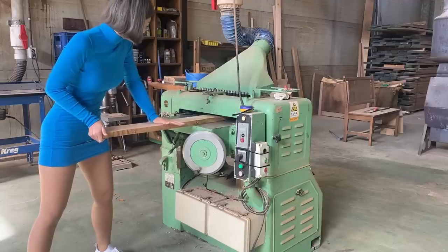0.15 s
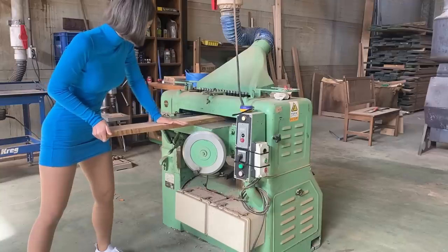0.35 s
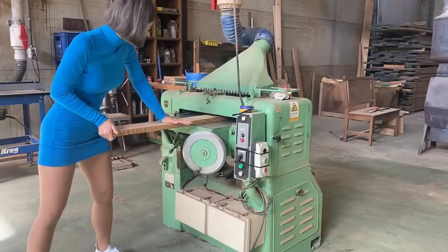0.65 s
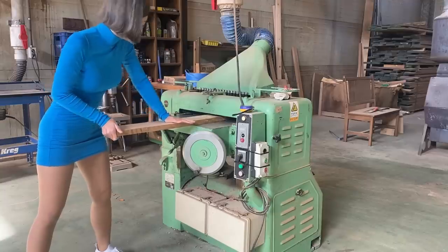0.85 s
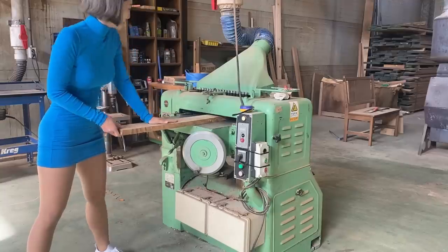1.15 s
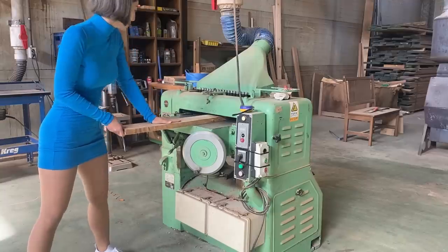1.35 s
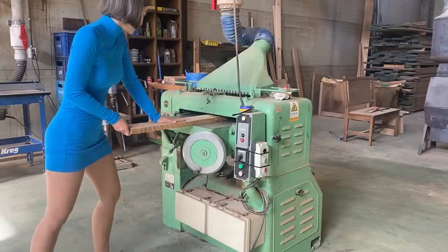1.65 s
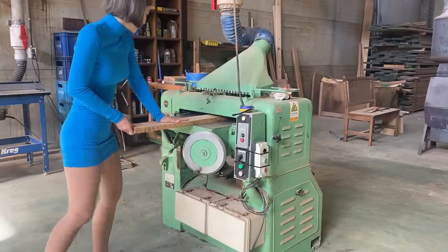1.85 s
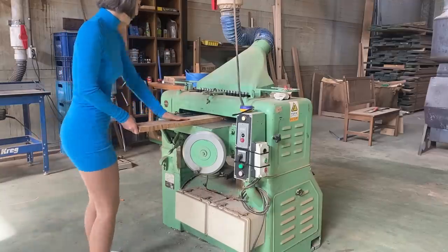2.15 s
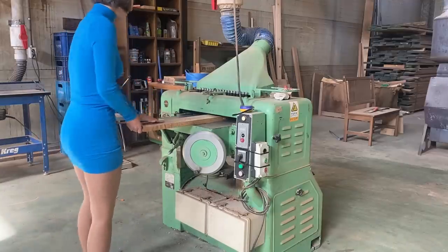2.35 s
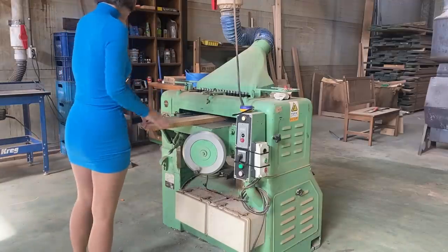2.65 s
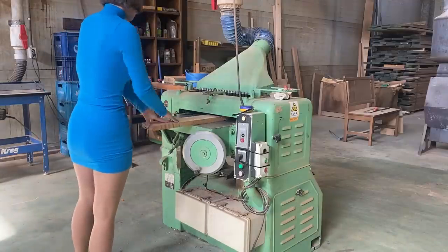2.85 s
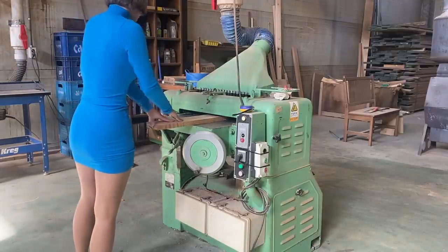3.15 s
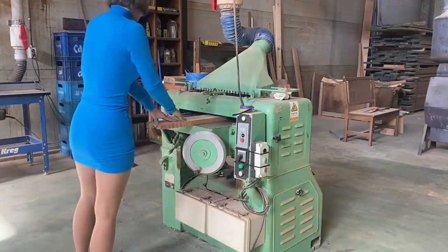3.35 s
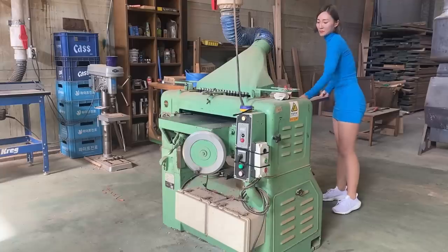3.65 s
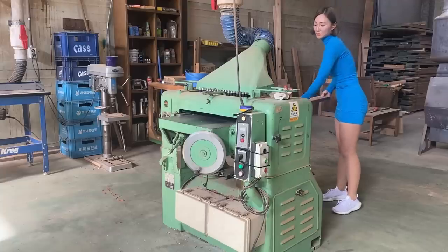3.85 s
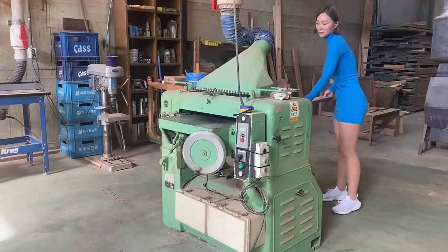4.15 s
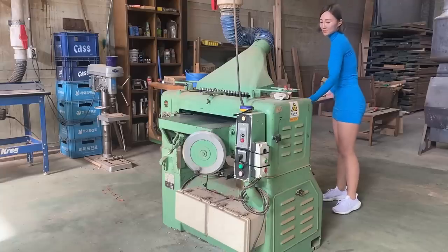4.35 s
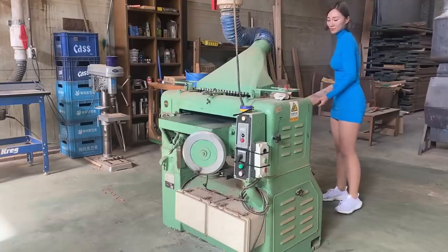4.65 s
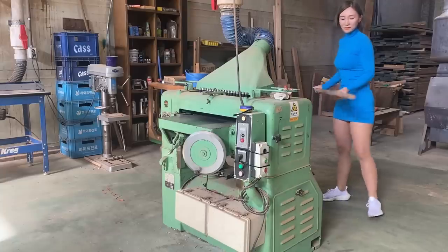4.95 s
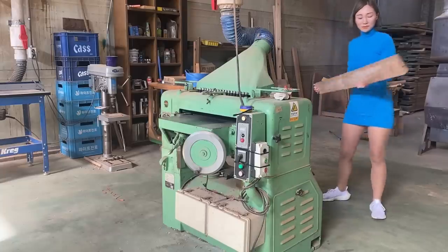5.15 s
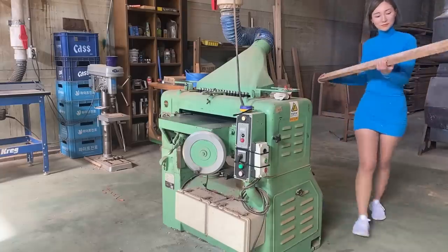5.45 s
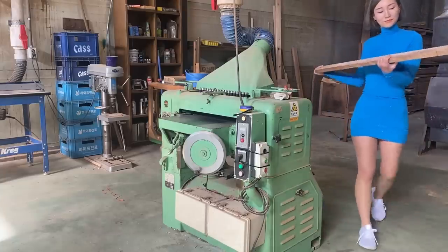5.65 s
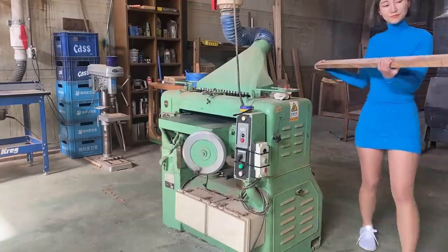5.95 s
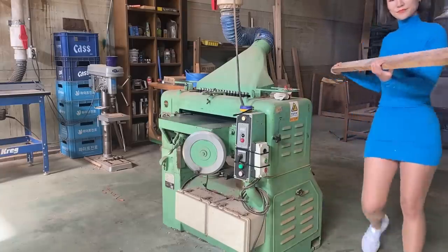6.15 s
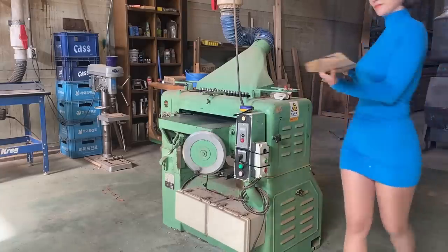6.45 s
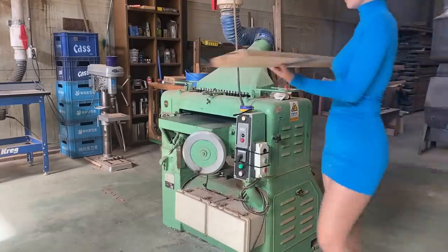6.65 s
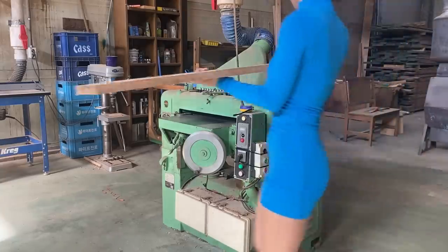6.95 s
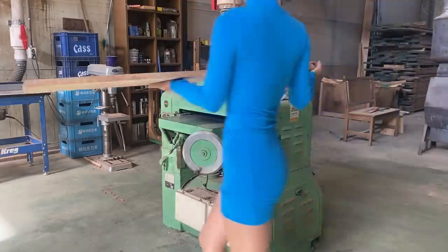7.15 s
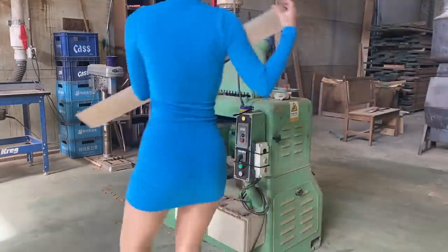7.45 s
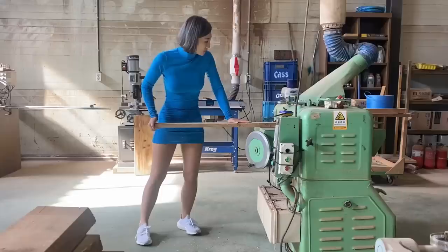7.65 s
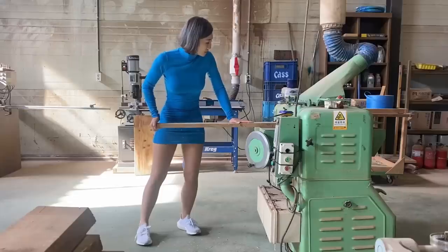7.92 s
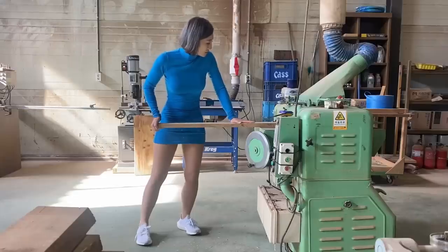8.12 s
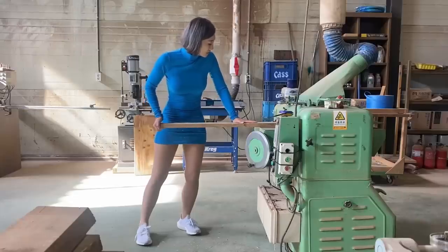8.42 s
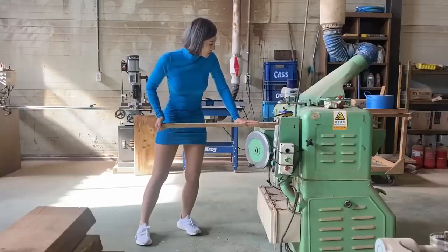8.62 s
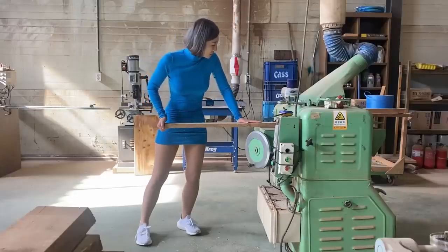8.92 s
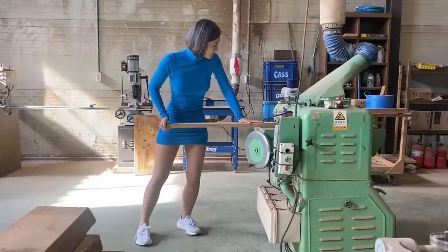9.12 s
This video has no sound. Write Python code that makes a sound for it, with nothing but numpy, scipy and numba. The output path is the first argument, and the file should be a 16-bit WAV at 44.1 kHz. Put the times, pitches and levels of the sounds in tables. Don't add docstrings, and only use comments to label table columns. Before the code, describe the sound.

From 0 s a large thickness planer is already cutting a board in a reverberant workshop: a steady low shaft buzz near 136 Hz carrying a bright, dense stack of harmonics, mostly 1 to 4 kHz, that shimmer and swell as the board slides through. Rapidly pulsing chip hiss roughens it, with a burst around 1 s; the top treble dulls after 2.3 s and the tail bites harder near 3 s. At 3.4 s it cuts abruptly to quieter idling: dull hum, rushing extractor air and a constant whistle near 520 Hz, creeping louder. Shoes scuff faintly at 4.1 s, clearly at 5.7 s, softly at 7.4 s. At 7.6 s another hard change brings a second cut, nearer, louder and brighter, with far more chip hiss and wandering whine, its finest treble gradually softening, continuing until 9.4 s.

```python
import sys
import numpy as np
from numba import njit
from scipy import signal
from scipy.fft import rfft, irfft
from scipy.io import wavfile
from scipy.ndimage import uniform_filter1d

SR = 44100
rng = np.random.default_rng(int(sys.argv[2]) if len(sys.argv) > 2 else 0)


def convert_level_to_amplitude(level_db):
    exponent = np.asarray(level_db, float) / 20
    return 10 ** exponent


def int16_out(signal):
    q = np.round(np.clip(np.atleast_2d(signal).T, -1, 1) * 32767)
    wavfile.write(sys.argv[1], SR, q.astype(np.int16))


N = 409248
STEP = 256

SPLICES = [
    0,
    3.419,
    7.622,
    9.4,
]
# time [s], load [dB].
LOAD = [
    [(0, 1.3), (0.5, 0.1), (1, -0.7), (1.4, -3.7), (2.2, -1.9), (2.78, -1.3), (2.95, 5.4), (3.2, 0.0),
     (3.42, 0.8)],
    [(7.62, 3.2), (7.75, 4.8), (7.95, -4.0), (8.1, -2.5), (8.3, -0.4), (8.5, -1.6), (8.7, -0.7),
     (9.1, -1.8), (9.28, 3.0)],
]
# frequency [Hz], side minus mid [dB].
SIDE_DB = [(50, -13), (100, -21.5), (180, -11), (300, -7), (480, -11), (750, -1.5), (1500, -1.5),
           (2800, -5), (4200, 0), (9000, -3.5), (11500, 3), (13000, 10), (15000, -3)]


def curve(rows):
    s, *columns = np.transpose(rows)
    return np.array([np.interp(np.arange(N) / SR, s, column) for column in columns])


def walk(rate, count):
    k = max(int(SR / STEP / rate), 1)
    x = rng.standard_normal((count, N // STEP + 3))
    x = uniform_filter1d(uniform_filter1d(x, k), k)
    return x / x.std()


def stretch(x):
    return np.interp(np.arange(N) / STEP, np.arange(len(x)), x)


def on_log_axis(hz, points):
    points = np.array(points)
    return np.interp(np.log(hz), np.log(points[:, 0]), points[:, 1])


def bump(s, at, half):
    return np.exp(-np.abs((s - at) / half) ** 3)


def shot_numbers():
    return np.searchsorted(np.array(SPLICES[1:]) * SR, np.arange(N), side="right")


def first_cut(turns):
    # order, left level [dB], right level [dB].
    first_orders = [(1, -67, -68.0), (2, -73, -72.5), (3, -67.0, -69.5), (4, -58.5, -60), (5, -69, -67.5),
                    (6, -72, -72.5), (7, -64.5, -71), (8, -54.5, -52), (9, -57.0, -57), (10, -55, -58),
                    (11, -55.0, -58.0), (12, -44.5, -46), (13, -48, -49.5), (14, -75, -62.5),
                    (15, -56, -62.5), (16, -47.5, -48.5), (17, -53, -54.5), (18, -59.5, -65),
                    (19, -56.5, -52.5), (20, -51.5, -58.5), (21, -50.5, -55.5), (22, -64, -55.5),
                    (23, -61.5, -64), (24, -64, -59.5), (25, -60, -59.5), (26, -63.5, -62.5),
                    (27, -57, -84), (28, -69, -67.0), (29, -62, -61), (30, -63, -65), (31, -60, -71.5),
                    (32, -60.0, -62), (38, -68, -73), (46, -67.5, -70.5), (56, -69.5, -76.5),
                    (68, -81.5, -81.5), (80, -80.5, -84), (92, -98, -91.5), (114, -86, -85)]
    # frequency [Hz], density [dB per Hz].
    first_chip_colour = [(300, -30), (750, -5.5), (1200, -3), (1900, -1), (2800, 0), (4200, -6),
                         (6500, -11), (9000, -16), (11500, -19), (13000, -25), (15500, -14)]
    knives = cutter(0, first_orders, turns, LOAD[0], wander_db=.9, wander_rad=.6, flicker_db=2.2, smear=.7)
    hissing = chips(LOAD[0], first_chip_colour, turns, db=-63.5, pan_db=1.8, gate=.5, patchy_db=2.6)
    return hood(knives + (shot_numbers() == 0) * hissing, 0)


def second_cut(turns):
    # order, left level [dB], right level [dB].
    second_orders = [(1, -58, -58), (2, -66, -66.5), (3, -57.0, -63), (4, -62, -53.0), (5, -54, -59.5),
                     (6, -74, -67), (7, -59.5, -58.0), (8, -53.0, -54.0), (9, -58, -56), (10, -53, -64),
                     (11, -61.5, -59), (12, -47, -53), (13, -54, -64), (14, -61.5, -52.5), (15, -55, -55),
                     (16, -45, -44), (17, -46, -49), (18, -53, -55), (19, -52, -61), (20, -58.5, -55),
                     (21, -50.5, -48.5), (22, -65, -52.5), (23, -56, -58), (24, -48.5, -54.5),
                     (25, -57.0, -64), (26, -57, -55), (27, -54.5, -52), (28, -54, -51), (29, -54.5, -56.0),
                     (30, -62, -68), (31, -53, -74), (32, -55.5, -54.5), (38, -61, -65), (46, -61.5, -66.0),
                     (56, -65.5, -69), (68, -69.5, -69), (80, -75, -75), (92, -87, -86), (114, -81, -77)]
    # frequency [Hz], density [dB per Hz].
    second_chip_colour = [(300, -17), (750, -4), (1200, -5.5), (1900, -1), (2800, .5), (4200, -3),
                          (6500, -6), (9000, -13), (11500, -15), (13000, -22), (15500, -17)]
    knives = cutter(2, second_orders, turns, LOAD[1], wander_db=.9, wander_rad=.65, flicker_db=2.4, smear=.9)
    hissing = chips(LOAD[1], second_chip_colour, turns, db=-53.7, pan_db=1.5, gate=.55, patchy_db=2.0)
    return hood(knives + (shot_numbers() == 2) * hissing, 1)


def idling(turns):
    # order, left level [dB], right level [dB].
    idle_orders = [(1, -63.0, -62.0), (2, -82, -79.5), (3, -70.5, -70.0), (4, -59.5, -64.5),
                   (5, -72.5, -72.0), (6, -77.5, -83), (8, -65, -65), (10, -86, -86), (11, -81.0, -91),
                   (12, -79, -73.0), (16, -73.5, -74.5), (20, -99, -93), (24, -88, -87), (28, -93, -92),
                   (32, -89, -94)]
    return cutter(1, idle_orders, turns, [], wander_db=1.3, wander_rad=.25, flicker_db=1.2, smear=.8)


def shaft_turns():
    # time [s], speed [Hz].
    first_speed = [(0.0, 136.3), (0.25, 136.1), (3.02, 136.0), (3.08, 135.5), (3.41, 135.6)]
    # time [s], speed [Hz].
    idle_speed = [(3.4, 137.68), (7.7, 137.68)]
    # time [s], speed [Hz].
    second_speed = [(7.64, 136.5), (7.68, 136.3), (9.184, 136.1), (9.266, 135.9), (9.28, 135.4)]
    shot = shot_numbers()
    tremble_hz = np.where(shot == 1, .1, .17) * stretch(walk(14, count=1)[0])
    speed = np.choose(shot, [curve(rows)[0] for rows in (first_speed, idle_speed, second_speed)])
    return np.cumsum(speed + tremble_hz) / SR


def cutter(shot, table, turns, load, wander_db, wander_rad, flicker_db, smear):
    steady_orders = [1, 4]
    first_cutting_order = 6
    first, last = int(SPLICES[shot] * SR), min(int(SPLICES[shot + 1] * SR), N)
    span = slice(first // STEP, last // STEP + 2)
    s = np.arange(span.start, span.stop) * STEP / SR
    listed, *listed_db = np.transpose(table)
    orders = np.union1d(listed, np.arange(32, listed[-1])).astype(np.int64)
    count, hz = len(orders), 136. * orders[:, None]
    chance = rng.standard_normal((count, 4)).T
    db = np.array([np.interp(orders, listed, d) for d in listed_db])
    db += (2.2 * chance[:2] - 3.0 + orders / 18) * (orders > 26)

    apart = np.arctan(convert_level_to_amplitude(on_log_axis(hz[:, 0], SIDE_DB))) * np.tanh(hz[:, 0] / 5000 + .4 * chance[3])
    phase = smear * np.cumsum(chance[2] * np.where(orders > 26, .9, 1.5)) + np.array([apart, -apart])

    weakness = np.clip(.45 + (db.max() - db.max(0)) / 16, 0, 1.3)
    loose = weakness * np.clip(orders / 28, 1, 1.5)
    loose = np.where(np.isin(orders, steady_orders), .15, loose)[:, None]
    shared = walk(3.5, count=2 * count)
    separate = walk(3.5, count=4 * count).reshape(2, 2 * count, -1)
    drift = .8 * shared + .65 * separate
    together = 1.6 * uniform_filter1d(drift, size=3, axis=1)
    drift = np.where(np.tile(hz, (2, 1)) > 4000, together, drift)
    level_drift, phase_drift = drift[:, :count], drift[:, count:, span]
    flicker = flicker_db * np.where(hz < 1000, .8, np.clip(hz / 3000, .5, .95))
    grain = flicker * loose * walk(17, count=count)
    size = convert_level_to_amplitude(wander_db * loose * level_drift + grain)[:, :, span]
    size = size * np.exp(1j * (phase[:, :, None] + wander_rad * loose * phase_drift))
    size *= convert_level_to_amplitude(db)[:, :, None] / np.sqrt(np.mean(np.abs(size) ** 2, axis=2, keepdims=True))

    bite = gain_control(np.clip(s, SPLICES[shot], SPLICES[shot + 1] - .001))[0]
    if len(load):
        cutting = np.interp(s, *np.transpose(load)) + board(hz, s, width=.065)
        bite = np.where(orders[:, None] >= first_cutting_order, cutting, bite)
    size *= swing(bite * np.clip(1.5 - hz / 13000, .7, 1)) * convert_level_to_amplitude(standing(shot, hz, s))
    return np.sqrt(2) * stack(turns, orders, np.ascontiguousarray(size.T), first, last, STEP)


@njit(fastmath=True)
def stack(turns, orders, size, first, last, step):
    out = np.zeros((2, len(turns)))
    for i in range(first, last):
        j = min(i // step - first // step, len(size) - 2)
        a = (i % step) / step
        z, p, k = np.exp(2j * np.pi * turns[i]), 1 + 0j, 0
        for n in range(len(orders)):
            while k < orders[n]:
                p, k = p * z, k + 1
            for c in range(2):
                out[c, i] += (p * (size[j, n, c] * (1 - a) + size[j + 1, n, c] * a)).real
    return out


def swing(db):
    return convert_level_to_amplitude(db) / np.sqrt(np.mean(convert_level_to_amplitude(db) ** 2, axis=-1, keepdims=True))


def board(hz, s, width):
    # time [s], half length [s], lift [dB], mode [Hz].
    first_swells = [(0.15, 0.04, 7.4, 2870.0), (0.31, 0.12, 7.0, 3230.0), (0.53, 0.07, 6.3, 2180.0),
                    (0.55, 0.07, 5.9, 2870.0), (0.55, 0.07, 8.6, 1470.0), (0.95, 0.12, 4.0, 2180.0),
                    (0.97, 0.07, 7.8, 1530.0), (1.03, 0.07, 10.1, 2980.0), (1.03, 0.07, 14.2, 3630.0),
                    (1.03, 0.35, 8.6, 1420.0), (1.25, 0.07, 8.0, 1530.0), (1.27, 0.07, 9.0, 3350.0),
                    (1.45, 0.35, 7.4, 1720.0), (1.47, 0.07, 7.6, 3490.0), (1.75, 0.35, 15.1, 1310.0),
                    (1.99, 0.2, 3.9, 1790.0), (2.01, 0.35, 7.6, 2980.0), (2.41, 0.12, 5.9, 2650.0),
                    (2.53, 0.35, 18.7, 1160.0), (2.55, 0.2, 6.7, 3490.0), (2.79, 0.07, 10.5, 3350.0),
                    (3.13, 0.2, 7.3, 3630.0), (3.13, 0.2, 11.4, 1530.0), (3.17, 0.2, 9.9, 2100.0),
                    (3.2, 0.27, 21, 970.0), (3.17, 0.35, 7.1, 1210.0), (3.31, 0.2, 8.3, 3100.0),
                    (3.35, 0.38, 16.2, 2650.0), (2.5, .42, 12, 820), (2.8, .15, 4, 2860)]
    # [s], [s], [dB], [Hz].
    second_swells = [(7.69, 0.07, 11.7, 2870.0), (7.75, 0.12, 5.4, 3770.0), (7.79, 0.13, 9, 1720.0),
                     (7.85, 0.07, 7.5, 2360.0), (7.89, 0.12, 7.4, 3100.0), (7.93, 0.12, 6.1, 3630.0),
                     (7.99, 0.12, 10.6, 1030.0), (7.99, 0.2, 3.9, 1590.0), (8.05, 0.12, 6.9, 2980.0),
                     (8.11, 0.12, 5.9, 2270.0), (8.11, 0.2, 8.7, 2650.0), (8.17, 0.12, 9.1, 1940.0),
                     (8.27, 0.07, 4.6, 4410.0), (8.23, 0.13, 7.5, 3740.0), (8.27, .09, 5, 6200),
                     (8.37, 0.04, 5.4, 2180.0), (8.57, 0.07, 5.0, 2550.0), (8.63, 0.04, 7.0, 2180.0),
                     (8.8, 0.15, 3.5, 4500.0), (8.99, 0.35, 12.7, 2180.0), (9.11, 0.07, 5.6, 4240.0),
                     (9.19, 0.12, 6.7, 2760.0), (9.21, 0.35, 4.0, 3230.0), (9.26, .05, 6, 2880)]
    return sum(db * bump(s, at, half) * np.exp(-(np.log(hz / mode_hz) / width) ** 2)
               for at, half, db, mode_hz in first_swells + second_swells)


def standing(shot, hz, s):
    # time [s], half length [s], left lift [dB], right lift [dB], frequency [Hz].
    first_early = [(0.02, 0.4, -3.5, -2.7, 1632), (0.04, 1.2, 4.9, 3.9, 3944),
                   (0.12, 0.06, -8.5, -7.0, 3400), (0.14, 0.1, 3.0, 5.2, 2856),
                   (0.14, 0.7, 0.8, -5.3, 2992), (0.16, 0.25, 7.7, 4.0, 3264),
                   (0.16, 0.7, -2.2, -3.7, 1496), (0.2, 0.06, -10.8, -4.7, 2040),
                   (0.2, 0.16, -7.2, -5.8, 3128), (0.2, 0.25, 3.8, 2.4, 2720), (0.2, 0.4, -2.6, -1.2, 1768),
                   (0.22, 0.06, -10.4, -7.2, 4352), (0.28, 0.06, -2.8, -6.8, 1088),
                   (0.42, 0.25, 6.2, 4.8, 4624), (0.52, 1.2, 2.6, 5.0, 952), (0.56, 0.4, -6.3, -5.6, 1088),
                   (0.6, 0.16, -5.9, -6.4, 3400), (0.78, 0.1, -4.8, -3.2, 2312),
                   (0.9, 0.06, -10.2, -8.8, 4488), (0.96, 0.06, 3.7, 5.5, 2856),
                   (0.96, 1.2, -3.4, 1.7, 2856), (1.0, 0.16, 5.4, 4.0, 3400), (1.04, 0.1, -0.7, -3.3, 1632),
                   (1.08, 1.2, 1.7, -5.2, 2584), (1.14, 1.2, -2.3, 6.3, 4488), (1.18, 1.2, -2.8, 3.3, 4216),
                   (1.2, 1.2, 2.5, -3.4, 1904), (1.24, 0.7, -8.5, -4.1, 2040),
                   (1.24, 1.2, -3.8, -7.8, 4760), (1.26, 0.4, -4.3, -2.4, 1360),
                   (1.26, 0.7, -4.0, -0.5, 1224), (1.4, 1.2, 6.4, 2.5, 4080), (1.42, 1.2, -6.4, 4.8, 3672),
                   (1.44, 1.2, 6.1, 5.4, 4624)]
    # [s], [s], [dB], [dB], [Hz].
    first_late = [(1.46, 0.1, -9.6, -9.5, 1496), (1.58, 0.06, -8.9, -7.1, 2312),
                  (1.66, 0.1, 9.4, 9.3, 2992), (1.72, 1.2, -0.4, -8.2, 2992),
                  (1.78, 0.06, -3.7, -2.2, 1632), (1.82, 0.16, -7.6, 0.5, 2720),
                  (1.88, 1.2, -2.6, -3.0, 2312), (1.92, 1.2, -3.5, -1.4, 1768), (2.0, 0.25, 3.0, 4.3, 2312),
                  (2.02, 0.1, 3.9, 4.9, 1360), (2.02, 1.2, 8.7, 7.3, 3808), (2.1, 1.2, -0.5, -5.6, 3264),
                  (2.2, 0.4, -1.2, -2.8, 1632), (2.28, 0.16, 6.0, 5.5, 4624),
                  (2.36, 0.06, -5.2, -4.9, 1768), (2.38, 0.16, -9.8, -6.3, 2448),
                  (2.5, 0.06, -7.4, -7.4, 3400), (2.5, 0.1, 7.0, 7.2, 3128), (2.5, 0.7, 2.1, 5.4, 2040),
                  (2.54, 0.16, 5.8, 7.0, 3536), (2.54, 0.25, -4.0, -5.1, 1088),
                  (2.54, 0.25, -2.2, -4.2, 2312), (2.7, 0.25, -4.4, -6.4, 2992),
                  (2.72, 0.4, 5.8, 0.1, 2584), (2.74, 0.25, -0.2, 3.6, 1224),
                  (2.78, 0.06, -10.2, -7.9, 2720), (2.78, 0.16, -7.4, -8.8, 2176),
                  (2.82, 0.16, 2.7, 3.9, 2856), (2.82, 0.16, 7.7, 4.0, 3400), (2.9, 0.25, -6.7, -6.9, 4080),
                  (3.1, 0.06, -1.9, -4.0, 1632), (3.22, 0.25, 2.7, 2.9, 2720),
                  (3.3, 0.16, -2.5, -5.4, 2584), (3.4, 1.2, -6.1, -2.3, 1360)]
    # [s], [s], [dB], [dB], [Hz].
    second_nodes = [(7.65, 0.06, -9.4, -6.1, 2312), (7.73, 0.06, -4.0, -9.5, 2720),
                    (7.73, 0.25, -2.3, -5.7, 3808), (7.73, 1.2, -4.1, -2.7, 2176),
                    (7.75, 0.16, -6.6, -1.7, 1360), (7.85, 0.4, 3.1, 2.2, 2584),
                    (7.93, 0.06, 6.0, 7.9, 2720), (7.95, 0.16, -5.8, -3.8, 4488),
                    (8.01, 0.1, 7.7, 5.6, 1496), (8.01, 0.7, -3.2, -3.4, 2448),
                    (8.03, 1.2, 3.2, -2.2, 2992), (8.05, 1.2, -6.7, 2.6, 4216),
                    (8.07, 0.06, 2.9, 7.9, 2040), (8.11, 1.2, 3.5, 1.7, 4760),
                    (8.13, 0.1, -1.9, -6.6, 2720), (8.13, 0.1, 6.9, 5.8, 3808),
                    (8.17, 0.25, 3.7, 7.0, 3400), (8.25, 0.1, -7.5, -0.3, 2040),
                    (8.25, 0.1, -5.7, -7.6, 3536), (8.31, 0.06, -1.9, -6.8, 3808),
                    (8.35, 0.25, 4.2, -0.1, 3672), (8.37, 0.1, 6.4, 3.9, 1904),
                    (8.41, 0.16, -6.8, -6.8, 3944), (8.41, 0.25, 4, 3.5, 4624),
                    (8.43, 0.16, -4.6, -0.9, 680), (8.43, 0.16, -3.6, -1.7, 1632),
                    (8.45, 0.16, -6.2, 0.8, 1768), (8.53, 1.2, 2.4, -3.1, 4488),
                    (8.57, 0.06, -3.7, -5.6, 2312), (8.63, 0.25, -7.5, -5.8, 1224),
                    (8.63, 0.7, -2.9, -3.8, 2856), (8.77, 0.7, -4.1, -0.4, 3264),
                    (8.79, 0.7, 3.3, 4.0, 952), (8.83, 0.25, -0.4, -8.8, 1904), (8.91, 0.7, 5.2, 3.8, 2720),
                    (8.93, 0.1, -3.0, -2.3, 2176), (8.99, 0.7, 6.9, 5.6, 4080),
                    (9.07, 0.4, -6.0, -3.5, 2040), (9.19, 0.16, -7.5, -1.9, 2584),
                    (9.27, 0.25, -5.4, -9.1, 3536)]
    # [s], [s], [dB], [dB], [Hz].
    low_nodes = [(4.1, .3, -4, -4, 1101), (4.6, .55, -8, -8, 1652), (6.8, .2, -3, -3, 2203),
                 (7.3, .2, 4, 4, 1652), (7.5, .12, -6, -6, 1101), (7.75, .2, -7, -7, 952),
                 (8.7, .12, -6, -5, 544), (8.85, .2, -5, -5, 952), (8.78, .12, -5, -5, 680),
                 (9.2, .1, 4, 4, 680), (9.26, .06, -6, -4, 544)]
    lift = 0
    for at, half, left_db, right_db, node_hz in first_early + first_late + second_nodes + low_nodes:
        if SPLICES[shot] <= at < SPLICES[shot + 1]:
            near = np.exp(-(np.log(hz / node_hz) / .025) ** 2)
            lift = lift + np.array([left_db, right_db])[:, None, None] * bump(s, at, half) * near
    return lift


def chips(load, colour, turns, db, pan_db, gate, patchy_db):
    # time [s], half length [s], burst [dB].
    tearout = [(.03, .05, 2), (.55, .06, 2), (1.02, .085, 6), (1.2, .07, 3), (2.15, .08, 1.5),
               (2.5, .08, 1.5), (3.2, .15, 1.5), (8.15, .1, 2), (8.45, .07, 2), (8.75, .07, 1.5),
               (9.0, .15, 2)]
    s = np.arange(N) / SR
    beat = 1 + gate * np.cos(2 * np.pi * turns)
    torn = sum(burst_db * bump(s, at, half) for at, half, burst_db in tearout)
    spray = hiss(colour, pan_db, patchy_db, patch_rate=7.0, ringing=.35)
    return spray * beat * convert_level_to_amplitude(curve(load)[0] + torn + db)


def hiss(colour, pan_db, patchy_db, patch_rate, ringing=0):
    hz = np.maximum(np.arange(STEP + 1) * SR / 2 / STEP, 1)
    band = (2 * np.log2(1 + hz / 200)).astype(int)
    patches = walk(patch_rate, count=band[-1] + 1)[band]
    db = on_log_axis(hz, colour)[:, None] + patchy_db * patches
    plain = np.sqrt(np.mean(convert_level_to_amplitude(db) ** 2))
    if ringing:
        s = np.arange(db.shape[1]) * STEP / SR
        db = db + ringing * board(hz[:, None], s, width=.16)
    cells = rng.standard_normal((2, *db.shape, 2)) @ [1, 1j] * convert_level_to_amplitude(db)
    cells[1] *= convert_level_to_amplitude(on_log_axis(hz, SIDE_DB))[:, None]
    sound = signal.istft(cells, SR, window="cosine", nperseg=2 * STEP, noverlap=STEP)[1]
    mid, side = sound[:, :N]
    spread = mid.std() * plain / np.sqrt(np.mean(convert_level_to_amplitude(db) ** 2))
    return np.array([(mid + side) * convert_level_to_amplitude(pan_db / 2), (mid - side) * convert_level_to_amplitude(-pan_db / 2)]) / spread


def hood(x, cut):
    # start [s], change [dB per s].
    muffle = [
        (2.3, -4.5),
        (7.8, -4.5),
    ]
    start, db_per_s = muffle[cut]
    treble = signal.sosfiltfilt(signal.butter(2, 8500, "high", fs=SR, output="sos"), x)
    return x - treble * (1 - convert_level_to_amplitude(db_per_s * np.maximum(np.arange(N) / SR - start, 0)))


def fan(db):
    fan_pan = [
        3.4,
        4.2,
        -1,
    ]
    blade_hz = 523.55
    pan_db = np.array(fan_pan)[shot_numbers()]
    phase = 2 * np.pi * blade_hz * np.arange(N) / SR + .35 * stretch(walk(4.0, count=1)[0])
    flutter = [stretch(w) for w in walk(9, count=2)]
    apart = np.array([[.4], [-.4]])
    whistle = convert_level_to_amplitude(1.2 * flutter[0]) * np.cos(phase + apart)
    octave = convert_level_to_amplitude(-18.5 + 3.0 * flutter[1]) * np.cos(2 * phase + 1.5 * apart)
    return np.sqrt(2) * convert_level_to_amplitude(db + 3.0 + np.array([pan_db, -pan_db]) / 2) * (whistle + octave)


def scuffs():
    # time [s], level [dB].
    scrapes = [
        (4.0841, -75),
        (5.6795, -58),
        (5.9194, -75),
        (7.3694, -69),
    ]
    colour = [(800, -25), (1500, -6), (3500, 0), (6000, -3), (9000, 1.5), (12000, -3), (15500, -5)]
    shape, t = np.zeros(N), np.arange(SR // 2) / SR
    scrape = np.exp(-(t / .022) ** 2) + .25 * np.exp(-t / .07)
    for at, db in scrapes:
        i = int((at - .005) * SR)
        shape[i:i + len(t)] += convert_level_to_amplitude(db - 6.5) * np.minimum(t / .003, 1) * scrape
    return shape * hiss(colour, pan_db=1.5, patchy_db=1.5, patch_rate=30.)


def air(hum_db):
    # frequency [Hz], density [dB per Hz].
    air_colour = [(40, -34), (55, -21), (80, -7), (115, -2), (180, -4), (400, -5), (620, -3), (800, -6),
                  (1200, -11.5), (1900, -16.5), (2800, -18), (4200, -24.5), (6500, -28.5), (11500, -35.5),
                  (15500, -40)]
    hz = np.maximum(np.arange(N // 2 + 1) * SR / N, 1)
    white = hiss([(100, 0), (15000, 0)], pan_db=1.5, patchy_db=.6, patch_rate=3.0)
    rush = irfft(rfft(white) * convert_level_to_amplitude(on_log_axis(hz, air_colour)) * np.minimum(hz / 40, 1), N)
    return rush / rush.mean(0).std() * convert_level_to_amplitude(hum_db - 1.2)


def gain_control(s):
    # hum and air at the start [dB], their creep [dB per s], whistle [dB], its creep [dB per s].
    gain = [
        (-67.8, -.1, -62.7, -.1),
        (-66.1, 1.55, -63, 1.55),
        (-57.6, -1.1, -61.5, -7.5),
    ]
    shot = np.minimum(np.searchsorted(SPLICES[1:], s, side="right"), 2)
    hum_db, hum_creep, fan_db, fan_creep = np.array(gain)[shot].T
    since = s - np.array(SPLICES)[shot]
    settling = (shot == 2) * 2.5 * np.exp(-since / .15)
    duck = (shot == 0) * -1.8 * np.clip((s - 2.95) / .3, 0, 1)
    moves = settling + duck
    return hum_db + hum_creep * since + moves, fan_db + fan_creep * since + .5 * moves


def scene():
    hum_db, fan_db = gain_control(np.arange(N) / SR)
    turns = shaft_turns()
    planer = first_cut(turns) + idling(turns) + second_cut(turns)
    return planer + fan(fan_db) + scuffs() + air(hum_db)


def low_pass(x):
    return signal.sosfilt(signal.butter(12, 16320, fs=SR, output="sos"), x)


def record(dry):
    fades = [
        .002,
        .008,
    ]
    s = np.arange(N) / SR
    dip = np.ones(N)
    for at, fade_s in zip(SPLICES[1:3], fades):
        dip *= np.clip(np.abs(s - at) / fade_s, .2, 1)
    below_top = np.arange(N // 2 + 1) * SR / N < 15760
    return low_pass(irfft(rfft(dry * dip) * below_top, N))


dry = scene()
out = record(dry)
int16_out(out)
```